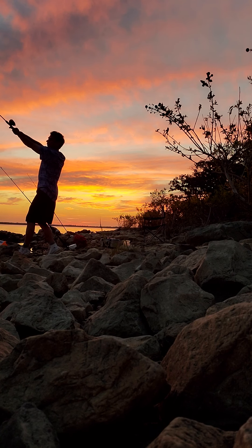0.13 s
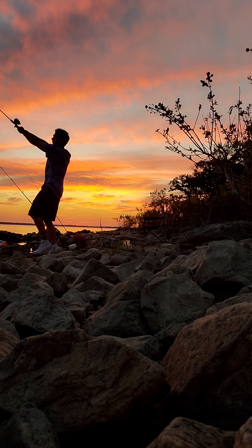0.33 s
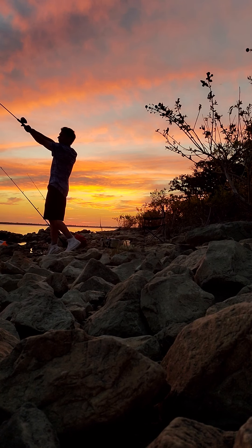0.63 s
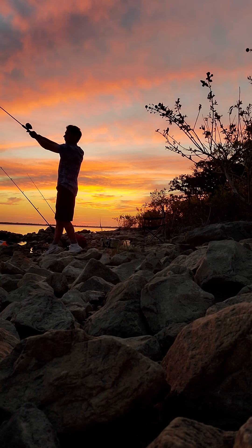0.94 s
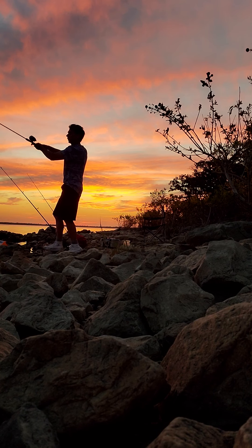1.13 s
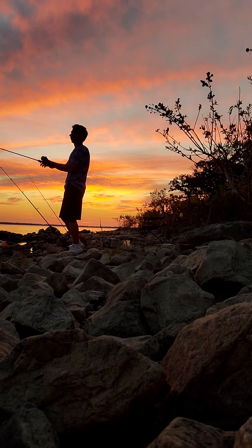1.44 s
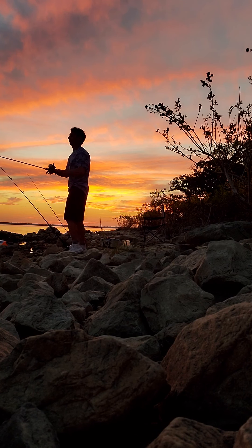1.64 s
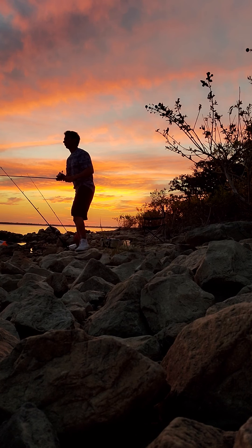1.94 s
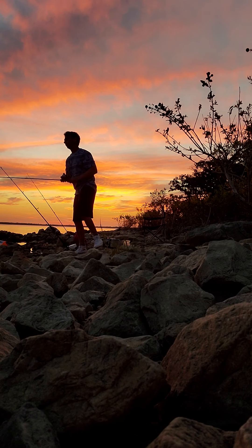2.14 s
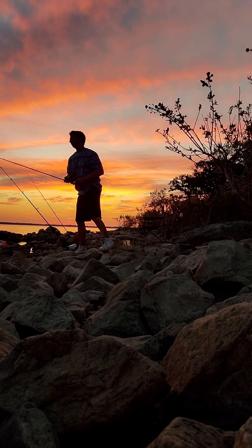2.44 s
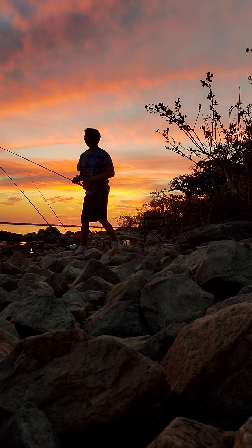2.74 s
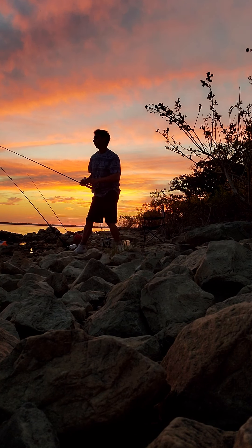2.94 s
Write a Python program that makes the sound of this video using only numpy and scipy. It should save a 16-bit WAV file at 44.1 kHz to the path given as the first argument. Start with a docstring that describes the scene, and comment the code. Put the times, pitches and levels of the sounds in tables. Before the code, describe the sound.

Loose stones knock under footsteps, with a small lure splash over low rumble.

```python
"""Loose stones knock dully under shoes on a rocky shore at dusk, each blow a short, damped ring, with
grit crunching and soles sliding. Before the loudest steps, an angler's lure splashes down on the left:
its air pocket gurgles upward and drops patter back. Faint whistles and a soft sinking tone pass by.
Low rumble and a thin hiss of far water lie underneath, all heard from a phone low among the boulders."""
import sys
import numpy as np
from scipy import signal
from scipy.fft import rfft, irfft
from scipy.io import wavfile
from scipy.ndimage import uniform_filter1d

SR = 44100
rng = np.random.default_rng(int(sys.argv[2]) if len(sys.argv) > 2 else 0)


def waveform_to_disk(signal):
    """Save audio, clipped to [-1, 1], as 16-bit WAV at the path in sys.argv[1]."""
    frames = np.transpose(np.atleast_2d(signal))
    scaled = np.clip(frames, -1, 1) * 32767
    samples = np.round(scaled).astype(np.int16)
    wavfile.write(sys.argv[1], SR, samples)


N = 136710

# Swell and fade of the spray. Each row: time in seconds, level in dB.
SPRAY_ENVELOPE = [(.489, -75), (.494, -55), (.53, -55.5), (.555, -54.5), (.59, -49), (.61, -52), (.66, -58),
                  (.7, -60), (.74, -66.5), (.95, -68), (1.065, -60), (1.11, -67), (1.25, -75), (1.35, -90)]
# Tone colour of spray and fizz. Each row: frequency in Hz, gain in dB.
SPRAY_EQ = [(620, -63), (1050, -34), (1280, -9.5), (1910, -5), (2070, -3.5), (2760, -12), (3340, 1.5),
            (3650, -5.5), (4880, -8.5), (5600, -17.5), (6800, -17.5), (7150, -34), (15000, -51.5)]
SIDE = np.array([[1], [-1]])  # plus on the left, minus on the right


def stone_knocks():
    """Each blow rings two close tones over a low thud, with a faint overtone and crack; boulders echo it."""
    # Stone on stone. Each row: start in seconds, level in dB, pitch in Hz, ring time to -60 dB in
    # seconds, offset of crack and overtone in dB.
    blows = [(.004, -56, 730, 0.028, -22), (.225, -57.5, 680, 0.018, -26), (.241, -45.5, 250, 0.068, -28),
             (.536, -47, 630, 0.018, -28), (.584, -47.5, 650, 0.019, -32), (.779, -41.5, 373, 0.0076, -30),
             (.838, -56, 750, 0.014, -30), (1.3955, -24, 782, 0.018, -33), (1.4001, -32, 1000, 0.025, -36),
             (1.5364, -22, 568, 0.012, -43), (1.545, -35, 436, 0.02, -37), (1.616, -51.5, 740, 0.02, -23),
             (1.677, -51.5, 720, 0.021, -21), (1.768, -51, 720, 0.02, -17), (1.784, -49.5, 426, 0.022, -17),
             (1.869, -54, 845, 0.016, -30), (1.887, -43, 722, 0.039, -33), (1.900, -41, 720, 0.01, -32),
             (1.907, -28.5, 736, 0.016, -40), (1.924, -47.5, 445, 0.022, -30),
             (1.960, -47.5, 636, 0.015, -25), (2.273, -28, 730, 0.018, -29),
             (2.336, -31.5, 715, 0.017, -27), (2.554, -44.5, 735, 0.016, -21),
             (2.567, -33.5, 667, 0.023, -19), (2.655, -35.5, 730, 0.014, -25.5),
             (2.760, -52.5, 560, 0.022, -26), (2.794, -49.5, 702, .027, -30),
             (2.828, -38, 636, 0.0081, -36), (2.834, -34, 476, 0.03, -37), (2.849, -37, 510, 0.044, -32),
             (2.889, -31.5, 570, 0.0096, -35), (2.896, -24.5, 421, 0.013, -41),
             (2.909, -28.5, 470, 0.015, -37), (2.918, -33, 742, 0.014, -30),
             (2.964, -35.5, 540, 0.015, -27), (3.019, -49, 596, 0.031, -26), (3.091, -53, 494, .03, -13)]
    # Tone colour of the crack. Each row: frequency in Hz, gain in dB.
    crack_eq = [(900, -14.5), (1500, 3.5), (2800, 1), (4500, -9)]
    # Echoes off nearby boulders. Each row: delay in seconds, gain in dB.
    boulders = [(.0045, -17), (.0085, -14), (.016, -20.5)]
    rise_s, body_top_hz = 0.002, 1008
    body, crack, overtone = np.zeros((3, N))
    for start, db, hz, t60, crack_db in blows:
        add(body, start, undb(db) * ring(hz, t60, rise_s))
        add(body, start, undb(db - 13) * ring(hz * 1.284, t60, rise_s))  # close second tone
        add(body, start, undb(db - 13) * ring(hz * 0.44, t60, rise_s))  # thud
        add(overtone, start, undb(db + crack_db + 1) * ring(hz * 2.134, t60, rise_s))
        add(crack, start + 0.00097, undb(db + crack_db) * burst(decay_s=0.0065))
    echoes = sum(undb(db) * np.roll(body, int(delay * SR)) * (-1) ** k
                 for k, (delay, db) in enumerate(boulders))
    body = signal.sosfilt(signal.butter(6, body_top_hz, fs=SR, output="sos"), body + echoes)
    crack = 2.4 * colour(crack, [(500, -32)] + crack_eq + [(9000, -63.5)])
    return (body + overtone + crack) * undb(0.5 * SIDE)  # a touch to the left


def shoe_shuffle():
    """Grit and small stones crunch under the soles; the soles hiss as they slide."""
    # Grit shifting underfoot. Each row: time in seconds, level in dB.
    crunch_envelope = [(0.0, -70.5), (0.4, -80), (.49, -78.5), (0.52, -61), (0.67, -71), (.8, -70.5),
                       (1.3, -77), (1.5, -78.5), (1.56, -58.5), (1.64, -68), (1.78, -68.5), (1.84, -68),
                       (1.92, -61.5), (2.02, -78.5), (2.43, -75.5), (2.58, -67), (2.74, -73), (2.77, -59.5),
                       (2.85, -53.5), (2.92, -50), (2.98, -64.5), (3.1, -73)]
    # Soles sliding. Each row: time in seconds, level in dB.
    slide_envelope = [(1.6, -85), (1.67, -71), (1.75, -88), (1.91, -75), (1.96, -78), (2.72, -82),
                      (2.79, -68.5), (2.84, -63.5), (2.875, -78.5), (2.9, -60), (2.93, -60), (2.95, -70),
                      (3.0, -79), (3.1, -77.5)]
    # Tone colour of the slide. Each row: frequency in Hz, gain in dB.
    slide_eq = [(800, -6), (1200, -4), (2000, -6), (3200, -6.5), (4600, 2.5), (5600, -7.5), (7200, -25.5),
                (15000, -34)]
    crunch_band = signal.butter(3, (334, 848), "band", fs=SR, output="sos")
    crunch = signal.sosfilt(crunch_band, patter(per_s=1200, scatter_db=2))
    slide = colour(patter(per_s=4000, scatter_db=3.18), slide_eq)
    crunch = level(crunch, 0) * undb(curve(crunch_envelope) + 1.8 * wander(24.74))
    slide = level(slide, 0) * undb(curve(slide_envelope) + 3.5 * wander(60))
    return crunch + slide


def lure_splash():
    """The lure hits the water: broad slaps, dense spray and fizz, and single drops that plink back."""
    # Falling drops. Each row: start in seconds, level in dB, pitch in Hz.
    drops = [(0.4943, -56.5, 3340), (0.5522, -45, 4660), (0.57, -41.5, 3320), (0.5976, -38, 4700),
             (0.646, -45.5, 3290), (0.67, -43.5, 3310), (0.7657, -57, 2830), (0.7892, -62, 3300),
             (0.9197, -58, 3930), (0.9553, -60, 3100), (1.005, -58, 2970), (1.0642, -48, 3470),
             (1.123, -57, 3930), (1.14, -49, 3830), (1.176, -58, 2520), (1.2322, -51.5, 3910)]
    # Slaps of water. Each row: start in seconds, level in dB.
    slap_hits = [(0.495, -49), (0.555, -42), (.599, -37.5)]
    drop_t60, glide = 0.015, 0.037
    mist = level(colour(patter(per_s=3500, scatter_db=2.3), SPRAY_EQ), -5)
    spray = (mist + fizz()) * undb(curve(SPRAY_ENVELOPE) + 1.3 * wander(40))
    for start, db, hz in drops:
        add(spray, start, undb(db) * ring(hz, drop_t60, 0.00085, glide))
        add(spray, start + 0.001054, undb(db - 9) * ring(hz * 1.186, drop_t60, 0.001, glide))
    slaps = np.zeros(N)
    for start, db in slap_hits:
        add(slaps, start, undb(db) * burst(decay_s=0.0021))
    return spray + colour(slaps, [(1000, -27), (2000, -13), (6500, -1.0), (8000, -19.5), (15000, -35)])


def fizz():
    """Tiny bubbles of many sizes each ring for a moment while the spray lasts."""
    per_s, low_hz, high_hz, scatter_db = 1400, 1211, 6952, 2.67
    start = SPRAY_ENVELOPE[0][0]
    span = SPRAY_ENVELOPE[-1][0] - start
    bubbles = np.zeros(N)
    for when, pitch, chance in rng.random((int(per_s * span), 3)):
        bubble = ring(low_hz + pitch * (high_hz - low_hz), t60=0.022, rise_s=0.0012, glide=0.044)
        add(bubbles, start + when * span, undb(-scatter_db * np.log(chance + 1e-9)) * bubble)
    return level(colour(bubbles, SPRAY_EQ), -4) * np.sqrt(span * SR / N)


def air_pocket():
    """The lure's air pocket breaks up in uneven glugs, higher as it shrinks; each climbs a little."""
    # Each row: start in seconds, level in dB, pitch in Hz, ring time to -60 dB in seconds.
    glugs = [(.564, -41, 283, 0.056), (.578, -41, 198, .03), (.589, -36.5, 221, 0.052),
             (.605, -41, 249, 0.035), (.619, -44.5, 380, 0.02), (.632, -47, 482, 0.035),
             (.645, -50, 592, 0.042), (.658, -47, 576, .04), (.672, -48.5, 613, 0.065),
             (.69, -58, 710, .04)]
    gurgle = np.zeros(N)
    for start, db, hz, t60 in glugs:
        add(gurgle, start, undb(db) * ring(hz, t60, rise_s=0.0037, glide=0.11))
    return gurgle * undb(1.5 * wander(120))


def sinking_tone():
    """A faint pure tone slides down in pitch."""
    # Path of the tone. Each row: time in seconds, pitch in Hz, level in dB.
    path = [(2.445, 419.4, -78), (2.46, 399, -64.5), (2.49, 366, -65.5), (2.54, 344, -69),
            (2.59, 333.5, -55.5), (2.62, 328, -60.5), (2.65, 323, -67), (2.67, 308.5, -75)]
    t = np.arange(N) / SR
    sounding = (t > path[0][0]) & (t < path[-1][0])
    phase = 2 * np.pi * np.cumsum(curve(path)) / SR
    return np.sqrt(2) * undb(curve(path, column=2)) * sounding * np.sin(phase)


def whistles():
    """Thin, short whistles sound far off."""
    # Each row: start in seconds, level in dB, pitch in Hz.
    notes = [(.052, -63, 4710), (.086, -72, 4700), (.175, -66.5, 4480), (.21, -69.5, 4900),
             (.228, -66, 4720)]
    track = np.zeros(N)
    for start, db, hz in notes:
        add(track, start, undb(db) * ring(hz, t60=0.095, rise_s=0.0042))
    return track


def rumble():
    """Low rumble swells a little, nearly alike on both sides."""
    # Tone colour of the rumble. Each row: frequency in Hz, gain in dB.
    rumble_eq = [(15, -26), (25, -19), (59, 1.5), (84, 2), (162, -7.5), (205, -11), (500, -30), (650, -63),
                 (1100, -120)]
    mid, side = colour(rng.standard_normal((2, N)), rumble_eq)
    return level(mid * undb(1.9 * wander(2.4)) + undb(-18) * side * SIDE, -57)


def far_water():
    """Distant water hisses, wide and leaning left; each octave band flickers on its own."""
    # Tone colour of the hiss. Each row: frequency in Hz, gain in dB.
    water_eq = [(530, -44), (900, -12.5), (1080, -21), (1300, -8), (1420, -7.5), (1700, 2), (2050, -8.5),
                (3240, 4), (3520, -1), (4980, -3), (7940, -31), (8740, -24.5), (15700, -16.5)]
    noise = colour(rng.standard_normal((2, N)), water_eq)
    hiss = 0
    for hz in 500 * 2. ** np.arange(6):
        band = colour(noise, [(hz / 2, -60), (hz / 2.3, -9), (hz, 0), (hz * 1.68, -9), (hz * 2, -60)])
        hiss = hiss + band * undb(wander(12.18))
    return level(hiss, -69.5) * undb(1.4 * SIDE)


def mic_ports(x, left_lead_s, tail_db, tail_t60):
    """Sound and its scatter off the rocks reach two microphone ports, the left one first."""
    # Shading by the phone's body. Each row: frequency in Hz, left over right in dB.
    shading = [(200, 0), (400, -2), (800, -7.5), (1300, -0.5), (2400, -0.5), (4400, 6.5), (8000, 16.5),
               (15000, 4)]
    # Scatter that differs between the ports, mostly treble. Each row: frequency in Hz, gain in dB.
    width = [(150, -23.5), (700, -15), (1500, 3), (15000, -1.5)]
    t = np.arange(N) / SR
    hz = np.fft.rfftfreq(N, 1 / SR)
    mid, side = rng.standard_normal((2, N)) * np.exp(-np.log(1000) * t / tail_t60)
    tails = rfft(mid) + gain_at(width, hz) * rfft(side) * SIDE
    scatter = tails * undb(tail_db) / np.sqrt(np.sum(mid ** 2))
    shade = np.sqrt(gain_at(shading, hz))
    left_right = np.array([shade, np.exp(-2j * np.pi * hz * left_lead_s) / shade])
    return irfft(rfft(x) * (1 + scatter) * left_right, N)


def ring(hz, t60, rise_s, glide=0.):
    """One resonance swells quickly and dies away; glide bends its pitch upward."""
    t = np.arange(int(SR * (t60 + 4 * rise_s))) / SR
    envelope = (1 - np.exp(-(t / rise_s) ** 2)) * np.exp(-np.log(1000) * t / t60)
    return envelope / envelope.max() * np.sin(2 * np.pi * hz * t * (1 + glide * t / t60))


def burst(decay_s):
    """A snap of noise with an instant attack."""
    return rng.standard_normal(600) * np.exp(-np.arange(600) / SR / decay_s)


def patter(per_s, scatter_db):
    """Irregular clicks, a few much louder than the rest."""
    chance, polarity, size = rng.random((3, N))
    return (chance < per_s / SR) * np.sign(polarity - .5) * undb(-scatter_db * np.log(size + 1e-9))


def wander(per_s):
    """Smooth random drift through per_s values a second."""
    hold = int(SR / per_s)
    steps = np.repeat(rng.standard_normal(N // hold + 1), hold)
    return 1.26 * uniform_filter1d(uniform_filter1d(steps, hold), hold)[:N]


def undb(db):
    """Decibels to gain."""
    return 10 ** (np.asarray(db) / 20)


def level(x, db):
    """Scale to an rms level."""
    return x * undb(db) / np.sqrt(np.mean(x ** 2))


def curve(table, column=1):
    """A table column joined by straight lines in time."""
    rows = np.array(table)
    return np.interp(np.arange(N) / SR, rows[:, 0], rows[:, column])


def gain_at(eq, hz):
    """Gain of an EQ curve at the given frequencies."""
    rows = np.array(eq)
    return undb(np.interp(np.log(hz + 1), np.log(rows[:, 0]), rows[:, 1]))


def colour(x, eq):
    """Filter through an EQ curve."""
    return irfft(rfft(x) * gain_at(eq, np.fft.rfftfreq(N, 1 / SR)), N)


def add(track, start, sound):
    """Mix a short sound in at start seconds."""
    i = max(int(start * SR), 0)
    track[..., i:i + sound.shape[-1]] += sound[..., :N - i]


def scene():
    """Stones, shoes and splash reach the two ports over a bed of rumble and far water."""
    knocks = mic_ports(stone_knocks() + sinking_tone(), left_lead_s=.00013, tail_db=-16.5, tail_t60=0.094)
    grit_and_glugs = mic_ports(shoe_shuffle() + air_pocket(), left_lead_s=.00013, tail_db=-2, tail_t60=0.047)
    splash = mic_ports(lure_splash() + whistles(), left_lead_s=.00004, tail_db=-5, tail_t60=0.041)
    return knocks + grit_and_glugs + splash + rumble() + far_water()


def record(dry):
    """The phone cuts the highest treble steeply."""
    top_hz = 15750
    return signal.sosfilt(signal.ellip(10, .2, 70, top_hz, fs=SR, output="sos"), dry)


dry = scene()
out = record(dry)
waveform_to_disk(out)
```